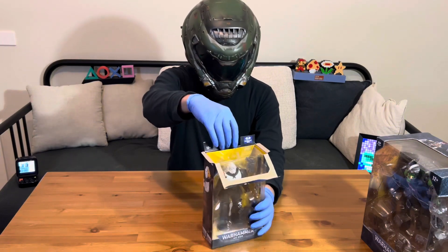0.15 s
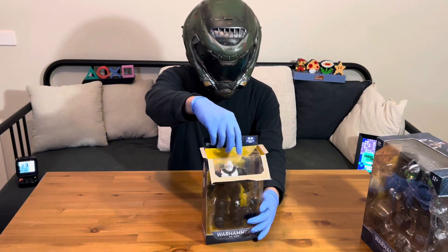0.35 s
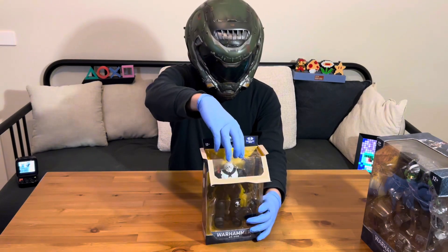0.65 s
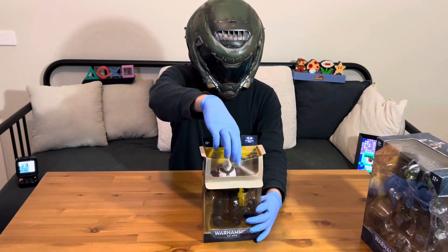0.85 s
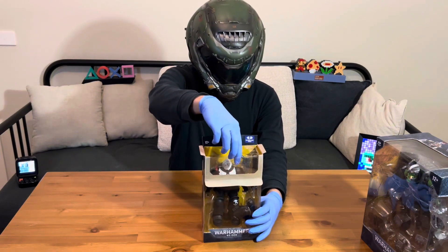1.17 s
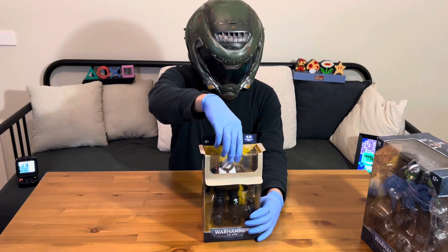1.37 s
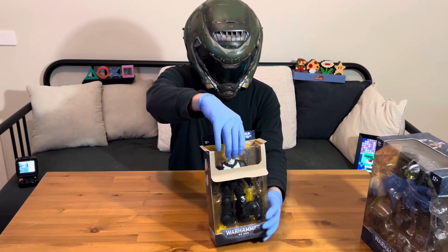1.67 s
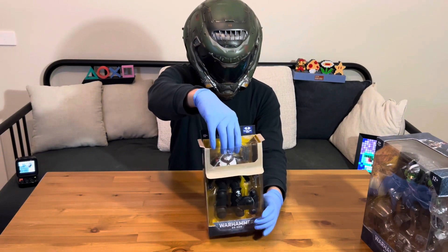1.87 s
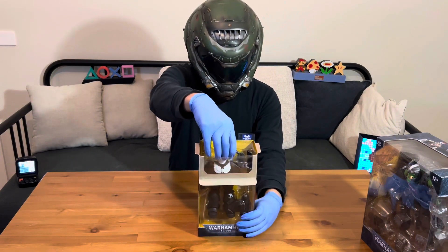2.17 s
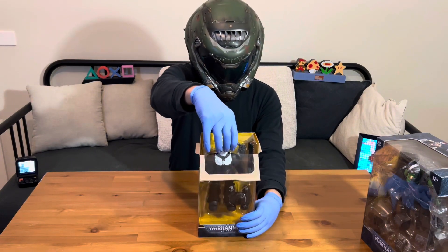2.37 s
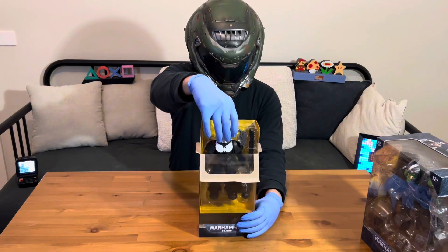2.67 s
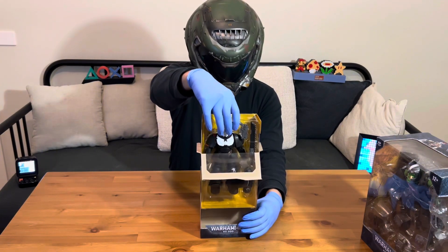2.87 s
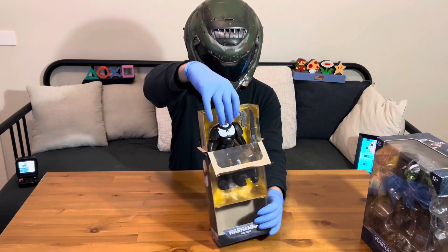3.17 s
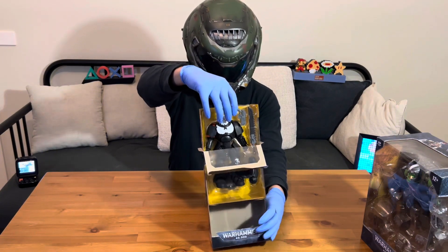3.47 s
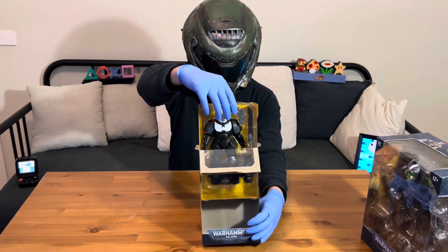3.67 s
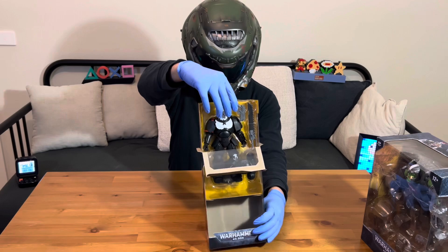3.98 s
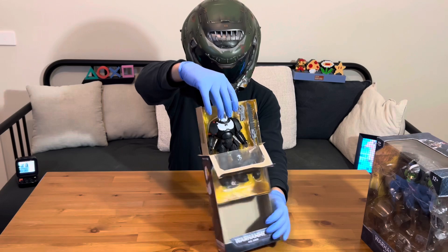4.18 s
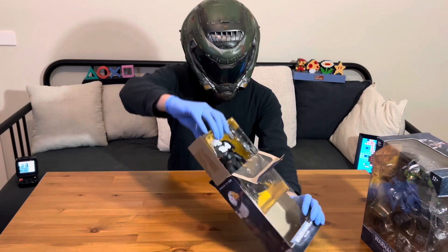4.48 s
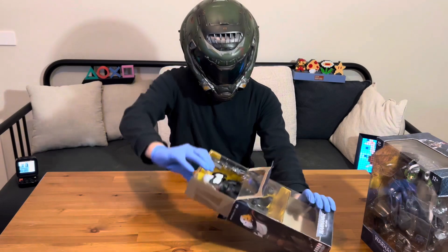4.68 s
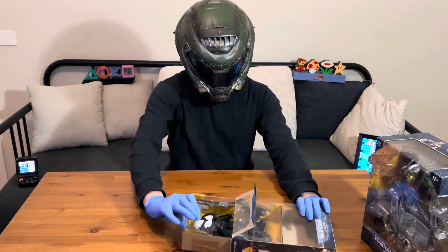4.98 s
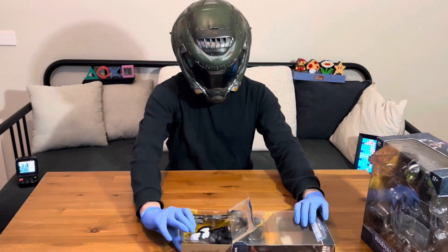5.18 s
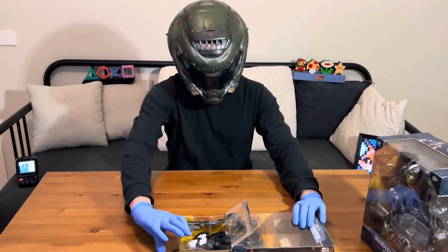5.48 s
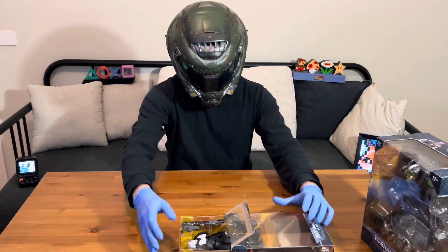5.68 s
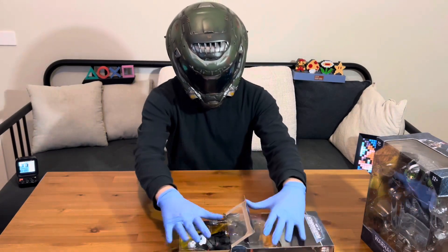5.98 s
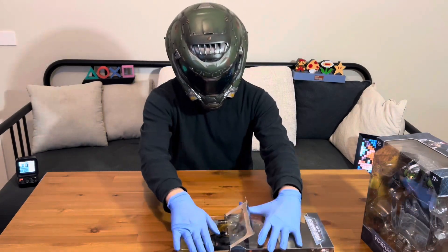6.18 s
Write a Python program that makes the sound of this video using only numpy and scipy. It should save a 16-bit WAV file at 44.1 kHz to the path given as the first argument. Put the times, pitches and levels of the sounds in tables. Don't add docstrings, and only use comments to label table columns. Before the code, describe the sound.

A cardboard box drags and knocks on a wooden table as a plastic tray is worked loose, then rubbed hard and banged down.

```python
import sys
import numpy as np
from scipy import signal
from scipy.fft import rfft, irfft
from scipy.io import wavfile
from scipy.ndimage import uniform_filter1d

SR = 44100
rng = np.random.default_rng(int(sys.argv[2]) if len(sys.argv) > 2 else 0)


def volts(x):
    e = np.asarray(x, float) / 20
    return 10 ** e


def master(y):
    cut = np.clip(np.atleast_2d(y).T, -1, 1)
    pcm = np.round(cut * 32767)
    wavfile.write(sys.argv[1], SR, pcm.astype(np.int16))


N = 279594


def unit(x):
    return x / np.sqrt(np.mean(x ** 2) + 1e-30)


def bins(size):
    return np.fft.rfftfreq(size, 1 / SR) + 1e-3


def along(table, hz):
    points = np.array(table)
    return np.interp(np.log(hz), np.log(points[:, 0]), points[:, 1])


def colour(x, table):
    size = x.shape[-1]
    return irfft(rfft(x) * volts(along(table, bins(size))), size)


def ring(x, modes):
    hz = bins(len(x))
    response = 0
    for k, (mode_hz, width, db) in enumerate(modes):
        resonance = 1j * hz * width / (mode_hz ** 2 - hz ** 2 + 1j * hz * width)
        response = response + (-1) ** k * volts(db) * resonance
    return irfft(rfft(x) * response, len(x))


def slips(size, scatter_db):
    return rng.standard_normal(size) * volts(scatter_db * np.minimum(rng.exponential(size=size), 5))


def walk(rate):
    hold = int(SR / rate)
    return uniform_filter1d(np.repeat(rng.standard_normal(N // hold + 1), hold), hold)[:N]


def burst(size, ms):
    t = np.arange(size) / SR
    fade = np.exp(-t / (max(ms, .5) / 1000)) * np.minimum(t / 0.0017, 1)
    spectrum = rfft(slips(size, 2.26) * fade)
    power = np.abs(spectrum) ** 2
    evened = spectrum / np.sqrt(power + 0.29 * power.mean())
    return irfft(evened, size) * np.sqrt(fade)


def add(out, s, db, sound):
    i = int(s * SR)
    out[i:i + len(sound)] += (volts(db) * sound / np.abs(sound).max())[:len(out) - i]


STROKE_DEPTH_DB, STROKE_BEND = 28, 1.523


def strokes(table, size=32):
    t = np.arange(0, N + size, size) / SR
    main, rider = 0, 0
    for s, rise, fall, db, rider_db in table:
        away = np.where(t < s, (s - t) / max(rise, .005), (t - s) / max(fall, .005))
        power = volts(2 * (db - STROKE_DEPTH_DB * away ** STROKE_BEND))
        main = main + power
        rider = rider + power * volts(2 * rider_db)
    return [np.interp(np.arange(N) / SR, t, np.sqrt(power)) for power in (main, rider)]


# pitch_hz, likeness_0_to_1
ALIKE = [(60, 0.99), (150, 0.79), (300, 0.57), (1000, 0), (5000, 0.01), (9000, 0.3), (14000, 0.91)]


def diffuse(size):
    alike = np.clip(along(ALIKE, bins(size)), 0, 1)
    mid, side = rfft(rng.standard_normal((2, size))) * np.sqrt([1 + alike, 1 - alike])
    return irfft([mid + side, mid - side], size) / np.sqrt(2)


# pitch_hz, level_db per Hz
AIR = [(15, -26), (25, 4), (92, 7.5), (144, -3.5), (273, -6.5), (543, -13), (1350, -20), (4860, -27),
       (5240, -22.5), (9000, -29.5), (10300, -48), (12000, -35.5), (13600, -59.5), (19800, -120)]
AIR_DB = -70
DUCK_FROM_DB, DUCK_SLOPE, DUCK_RELEASE_S = -37.5, 0.61, 0.32


def room_air(heard):
    air = volts(AIR_DB + 1.3 * walk(1.9)) * unit(colour(diffuse(N), AIR))
    keep = np.exp(-1 / (DUCK_RELEASE_S * SR))
    loud = signal.lfilter([1 - keep], [1, -keep], np.mean(heard ** 2, axis=0))
    return air * (1 + loud / volts(2 * DUCK_FROM_DB)) ** (-DUCK_SLOPE / 2)


# pitch_hz, t60_s
ROOM_T60 = [(60, 0.59), (150, 0.45), (500, 0.37), (1500, 0.41), (4000, 0.42), (7500, 0.34), (11000, 0.42),
            (16000, 0.31)]
# delay_s, spread_s, level_db over the tail
ECHOES = [(.004, 0.0012, 12.5), (.010, 0.00068, 7.5), (0.02, 0.0021, 5.5), (0.039, 0.0023, 3.5)]


def room(wet_db, size=24000):
    t, hz = np.arange(size) / SR, bins(size)
    noise = rfft(diffuse(size))
    tail = 0
    for centre in 30 * 2 ** np.arange(10.):
        band = np.clip(1 - np.abs(np.log2(hz / centre)), 0, 1)
        tail = tail + irfft(noise * band, size) * volts(-60 * t / along(ROOM_T60, centre))
    early_db = sum(db * np.exp(-((t - s) / spread) ** 2) for s, spread, db in ECHOES)
    response = volts(early_db + wet_db) * tail * np.minimum(t / 0.0062, 1)
    response[0, 0] += 1
    response[1, 2] += 1
    return response


# pitch_hz, width_hz, level_db
TABLE = [(62.5, 9.9, 4.5), (101, 180, -6.5), (164.6, 13, 0.5), (233.7, 18, -2)]
# start_s, peak_db, upper_modes_db re peak, contact_ms
THUDS = [(0.037, -66, -1, 3.4), (0.16, -51, -22, 6), (0.495, -45, 0, 4), (0.768, -47, 7, 5),
         (0.815, -34, -8, 4.8), (0.901, -35.5, -10, 10), (1.295, -44.5, -29, 6.7), (1.675, -71, -8, 2.9),
         (2.062, -31, -11.5, 1.6), (2.1, -34.5, -11, 8), (2.237, -54, -15, 3.1), (2.36, -61, -4, 7.2),
         (3.097, -45.5, -2, 3.7), (3.377, -45, -9, 3.9), (4.299, -65, 6, 3.4), (4.849, -56, 12, 1.4),
         (5.018, -58, -10, 5), (5.09, -45, 9, 4), (5.348, -60, -10, 4.8), (5.433, -41.5, -5, 7.5),
         (5.501, -36, -21, 7.6), (6.1, -55, -4.5, 5.3)]


def thuds(size=16384):
    out, t = np.zeros(N), np.arange(size) / SR
    for s, peak_db, upper_db, ms in THUDS:
        modes = TABLE[:2] + [(hz, width, db + upper_db + 17.0) for hz, width, db in TABLE[2:]]
        push = t * np.exp(-t / (max(ms, .5) / 2000))
        add(out, s - .003, peak_db - 10.5, ring(push, modes))
    return out


# pitch_hz, level_db per Hz
CARD = [(120, -53), (200, -1.5), (574, 6.5), (812, 2), (894, 0.5), (1120, -4.5), (1630, -6), (3500, -18.5),
        (4550, -59), (7700, -120)]
# pitch_hz, width_hz, level_db
BOX = [(340, 13, -20.5), (418, 15, -12), (584, 37.3, 3), (674, 4.9, -14.5), (903, 54, -0.5),
       (1020, 370, -13.5), (1320, 100, -17), (1700, 16, -4.5), (2430, 140, -11), (2970, 83, -29)]
# pitch_hz, level_db per Hz
RUB = [(900, -35), (1800, -10), (2700, 1), (4500, -0.5), (6500, 0.5), (9000, -6.5), (11000, -29)]
# pitch_hz, level_db per Hz
SHEEN = [(9000, -33.5), (11000, 0), (13000, -4.5), (16000, -3.5)]
# pitch_hz, level_db per Hz
SCUFF = [(600, -33.5), (1000, -5), (1600, -0.5), (2500, -4.5), (3600, -11), (5000, -46)]
# pitch_hz, level_db per Hz
HOLLOW = [(170, -32.5), (250, -5.5), (320, -3), (420, -2), (600, -39)]
# pitch_hz, level_db per Hz
SNAP = [(400, -27.5), (800, 4.5), (1100, 2), (1600, 2.5), (2300, -2), (3200, -8), (4300, -18),
        (6000, -39.5)]
# strongest_s, build_up_s, let_go_s, level_db,
# table_rumble_db re drag
DRAGS = [(0.0, .05, 0.36, -49, -9), (.35, 0.16, 0.18, -52.5, 4.5), (.494, 0.09, 0.23, -50.5, 3),
         (.785, 0.13, 1, -61, -10), (1.16, 0.035, 0.25, -65.5, -1), (1.25, 0.073, 0.28, -58, -3.5),
         (1.514, 0.07, 0.12, -55.5, -8), (1.75, 0.11, 0.071, -54.5, 0), (1.795, 0.029, 0.16, -53.5, -3),
         (2.07, 0.088, 0.32, -49, -3.5), (2.37, 0.23, 0.34, -51.5, 0.5), (2.63, 0.46, 1, -58.5, -31),
         (3.1, 0.098, 0.076, -55.5, -10), (3.37, 0.25, 0.12, -56.5, -11), (3.69, 0.25, 0.21, -58, -13.5),
         (3.95, 0.21, 0.75, -65.5, -6), (4.2, 0.039, 0.11, -63, 1.5), (4.29, 0.0077, 0.034, -52.5, -23),
         (4.4, 0.064, 0.096, -65, 4.5),
         (4.688, 0.064, 0.24, -55, -14),
    (4.92, 0.21, 0.12, -58.5, 10.5),
    (5.086, 0.077, 0.24, -50, 0),
    (5.21, 0.097, 0.32, -44, -3),
    (5.29, 0.079, 0.11, -41, -19),
    (5.364, 0.033, 0.18, -38, -13.5),
    (5.46, 0.13, 0.28, -44.5, -5.5),
    (6.14, 0.072, 0.51, -61, -0.5),
    (6.209, 0.051, 0.0663, -47.5, -15),
]
# strongest_s, build_up_s, let_go_s, level_db,
# sheen_db re rub
RUBS = [(0.0, .02, 0.07, -53.5, -18), (.126, 0.29, 0.11, -65, -24), (.38, 0.34, 0.23, -62.5, -22),
        (.5, 0.013, 0.12, -59.5, -31), (.7, 0.0074, 0.87, -69.5, -26), (1.25, 0.033, 0.22, -70.5, -19),
        (1.5, 0.057, 0.17, -62, -20), (1.74, 0.11, 0.022, -57.5, -39), (1.815, 0.0069, 0.12, -53, -40),
        (2.04, .025, 0.13, -57, -21), (2.14, 0.14, 0.07, -62.5, -26), (2.33, 0.52, 0.84, -59, -26.5),
        (2.63, 0.15, 1, -68.5, -21), (3.1, 0.11, 0.068, -55, -16), (3.34, 0.16, 0.099, -61.5, -24),
        (3.66, 0.088, 0.075, -68, -22), (3.73, 0.23, 0.1, -66, -25), (3.96, 0.095, 0.12, -69, -16),
        (4.18, 0.085, 0.025, -66, -21), (4.23, .02, 0.023, -84, -25), (4.03, 0.053, 0.057, -78, -21.5),
        (4.63, 0.059, 0.052, -74, -5.5), (6.08, 0.034, 0.055, -73.5, -12.5),
             (4.72, 0.15, 0.12, -58.5, -36), (4.92, 0.18, 0.42, -71.5, -23),
             (5.086, 0.077, 0.42, -62.5, -27), (5.21, 0.049, 0.11, -45.5, -18),
             (5.291, 0.019, 0.087, -41.5, -18), (5.39, 0.17, 0.32, -46, -27.5),
             (5.749, 0.11, 0.055, -59.5, -21.5), (5.962, 0.084, 0.064, -67.5, -16),
             (6.14, 0.063, 0.28, -66, -21), (6.196, 0.016, 0.11, -54.5, -40)]
# strongest_s, build_up_s, let_go_s, level_db, hollow_boom_db re scuff
SCUFFS = [(1.4, 0.15, .15, -83, 18), (1.55, 0.099, 0.086, -66, 9), (2.3, 0.084, 0.25, -55, -14),
          (2.75, 0.23, 0.2, -55, -27), (3.07, 0.25, .1, -61, -5), (3.13, 0.086, 0.14, -71, 12),
          (3.33, 0.2, 0.065, -57, -15), (3.68, 0.21, 0.13, -58.5, -6), (3.76, 0.12, 0.081, -56.5, -12),
          (3.95, 0.13, 0.24, -64, -11), (4.17, 0.076, 0.094, -64, -3), (4.3, 0.024, 0.052, -75, -4),
          (4.45, .04, 0.085, -79.5, 0), (4.9, .05, 0.28, -68, 7), (5.55, 0.072, 0.26, -57, 3)]
RIBS_DB = -17


def slide():
    drag, shake = strokes(DRAGS)
    rub, sheen = strokes(RUBS)
    scuff, boom = strokes(SCUFFS)
    grip = slips(N, 3.0) * volts(3 * walk(60))
    body = unit(unit(colour(grip, CARD)) + 0.029 * unit(ring(grip, BOX)))
    push = colour(rng.standard_normal(N), [(250, -3.5), (500, -41.0)]) * volts(2.1 * walk(7.3))
    rumble = unit(ring(push, TABLE))
    glove, edge = np.roll(grip, N // 3), np.roll(grip, -N // 3)
    skin = volts(-5.5) * rub * unit(colour(glove, RUB))
    skin = skin + volts(4.5) * sheen * unit(colour(glove, SHEEN))
    scraping = scuff * unit(colour(edge, SCUFF)) + boom * unit(colour(edge, HOLLOW))
    chatter = rub * unit(colour(grip ** 2 * np.sign(grip), SNAP))
    skin = skin + volts(-9.0) * scraping + volts(RIBS_DB) * chatter
    return volts(-5.5) * drag * body + skin + volts(-8.5) * shake * rumble


# level_db, pitch_hz, width_hz, spread_s
SQUEAK = (-62, 8108, 1300.5, 0.03)
SQUEAK_S = 5.756
SQUEAK_DRAG_DB, SQUEAK_DRAG_S = -11, .04


def glove_squeak():
    level_db, hz, width, spread = SQUEAK
    mode = [(hz, width, 0)]
    whistle = unit(ring(ring(rng.standard_normal(N), mode), mode))
    away = np.arange(N) / SR - SQUEAK_S
    swell = np.exp(-(away / spread) ** 2) + volts(SQUEAK_DRAG_DB) * np.exp(-(away / SQUEAK_DRAG_S) ** 2)
    return volts(level_db) * whistle * swell


# pitch_hz, level_db per Hz
FILM = [(4000, -31), (7500, -3), (11000, 1), (13000, 5.5), (16000, -6)]
# start_s, peak_db, length_ms
TICKS = [(0.379, -51.5, 2.8), (0.4914, -58, 1), (0.6983, -70, 2.5), (0.8092, -29.5, 3.1), (0.819, -35, 2.3),
         (1.663, -55, 5.6), (1.81, -42, 0.59), (2.017, -47.5, 2.5), (2.0604, -66, 2.2), (2.232, -55, 4.6),
         (4.6583, -69.5, 3), (5.1956, -36.5, 1.45), (5.274, -39, 3.4), (5.3627, -39.5, 2),
         (5.4329, -30, 3.2), (6.1978, -66, 2.1)]


def ticks(size=2048):
    out = np.zeros(N)
    for s, peak_db, ms in TICKS:
        add(out, s - .0005, peak_db + 2.5, colour(burst(size, ms), FILM))
    return out


# pitch_hz, level_db per Hz
CRACK = [(2500, -28), (5000, -5), (8000, -5), (11500, -0.5), (16000, -6.5)]
# start_s, peak_db
CRACKS = [(0.381, -43), (0.4977, -40), (0.6983, -68), (0.8096, -31), (0.8148, -41), (1.6628, -47),
          (1.8126, -35.5), (2.017, -46), (2.2335, -58), (3.084, -56), (4.6585, -54), (4.8565, -68),
          (5.1955, -47), (5.285, -44.5), (5.365, -45.5), (5.4351, -38.5), (6.0905, -69), (6.1985, -56)]


def cracks(size=256):
    out, t = np.zeros(N), np.arange(size) / SR
    for s, peak_db in CRACKS:
        snap = colour(rng.standard_normal(size) * np.exp(-t / 0.0005), CRACK)
        add(out, s, peak_db, snap * np.exp(-t / 0.001))
    return out


# start_s, peak_db, pitch_hz, t60_ms
PINGS = [(0.038, -66, 1630, 21), (0.193, -41, 970, 20), (0.21, -34, 487, 20), (0.39, -51, 1360, 24),
         (0.493, -48, 1780, 41), (0.54, -47, 685, 60), (0.761, -53, 1130, 25), (0.818, -23, 1305, 20),
         (0.822, -24.5, 680, 57), (0.824, -30.5, 1050, 26), (1.173, -63, 2280, 26), (1.294, -41, 1340, 16),
         (1.309, -46.5, 329, 100), (1.515, -52, 1010, 32), (1.813, -38.5, 1210, 25),
         (1.812, -48.5, 2290, 22), (2.072, -64, 1593, 40), (2.233, -46.5, 1570, 27), (2.233, -51, 3670, 15),
         (2.353, -57.5, 845, 37), (2.525, -39, 880, 22), (2.522, -39.5, 1960, 26), (3.055, -57.5, 1690, 33),
         (3.296, -57, 883, 38), (3.621, -58, 880, 25), (3.635, -56.5, 1020, 17), (4.164, -63.5, 1800, 28),
         (4.181, -59.5, 1560, 22), (4.222, -66, 1550, 20), (4.452, -71, 2920, 15), (4.66, -40, 1950, 11),
         (4.66, -45, 526, 46), (4.665, -50, 907, 160), (4.857, -36, 520, 18), (4.858, -53.5, 1210, 39),
         (5.157, -42, 1680, 32), (5.225, -36.5, 600, 44), (5.261, -38.5, 535, 39), (5.277, -39, 860, 30),
         (5.305, -37, 1706, 30), (5.35, -34, 1020, 30), (5.349, -40.5, 270, 50), (5.384, -39.5, 1448, 23),
         (5.439, -26.5, 1610, 62), (5.44, -28.5, 252, 52), (5.44, -31, 2200, 69), (5.445, -32.5, 1056, 52),
         (5.458, -20.5, 560.7, 113), (5.45, -28.5, 349, 60), (6.2, -50.5, 850, 170)]
# start_s, peak_db, pitch_hz, t60_ms
EDGE_RINGS = [(0.052, -36.5, 630, 17), (1.172, -54, 640, 22), (2.062, -37, 149.5, 78),
              (4.857, -45.5, 172, 74), (5.445, -35, 143.7, 70), (1.813, -46.5, 630, 28),
              (1.832, -52, 1300, 18), (2.5225, -33.5, 1460, 8.3), (2.523, -43.5, 2930, 8.2),
              (2.694, -60, 1670, 25), (3.66, -61.5, 1670, 25), (3.732, -60.5, 1070, 25),
              (4.287, -63.5, 1090, 25), (4.293, -61.5, 500, 19), (4.37, -60.5, 1156, 50),
              (4.452, -71.5, 1950, 12), (4.547, -72, 1610, 12), (5.176, -48.5, 460, 71),
              (5.212, -38.5, 590, 46), (5.221, -36.5, 388, 91), (5.364, -39, 260, 45),
              (5.434, -24.5, 1410, 16), (5.437, -19, 560, 74), (5.459, -19, 520, 33), (5.49, -36.5, 813, 74),
              (6.124, -54, 480, 20), (6.197, -51, 1390, 25), (6.21, -55, 890, 31), (6.213, -44, 1440, 25),
              (6.252, -54, 1430, 38)]
PING_PAIR, PING_PAIR_DB, PING_RISE_MS = 0.98, -9.5, 0.39


def pings(table, size=8192):
    out, t = np.zeros(N), np.arange(size) / SR
    for s, peak_db, hz, ms in table:
        pair = np.sin(2 * np.pi * hz * t) + volts(PING_PAIR_DB) * np.sin(2 * np.pi * PING_PAIR * hz * t)
        fade = volts(-60 * t / (max(ms, 5) / 1000)) * (1 - np.exp(-t / (PING_RISE_MS / 1000)))
        add(out, s - .001, peak_db, pair * fade)
    return out


# pitch_hz, level_db per Hz
HISS = [(2000, -24), (3200, 1.5), (5000, 0.5), (6500, 0.5), (8800, -8), (11600, -19), (16000, -23.5)]
# start_s, peak_db, pitch_hz, snap_db re peak, length_ms
CARD_KNOCKS = [(0.037, -30, 618, -24, 4.5), (0.05, -33, 516, -39, 19), (0.1925, -29.5, 549, -30, 1.6),
               (0.7, -50, 1070, 21, 8.9), (0.762, -48, 246, -9, 19), (1.173, -44, 613, -11, 12),
               (1.286, -45, 670, -15, 7.7), (1.297, -30.5, 480, -21.5, 3.8), (2.352, -42, 298, -4, 7.1),
               (2.5235, -27, 526, 5, 2.1), (4.289, -53, 401, -9.5, 4.6), (4.371, -59, 1217, -15.5, 5.6),
               (4.546, -63, 494, -14.5, 5.3), (5.015, -48.5, 624, -14, 8), (5.085, -41.5, 388, -5.5, 6),
               (5.158, -29.5, 867, -2, 4.8), (5.222, -36.5, 386, -28, 6.7)]
# start_s, peak_db, pitch_hz, snap_db re peak, length_ms
TRAY_KNOCKS = [(0.492, -35, 454, -0.5, 3.5), (0.809, -18, 529, -10, 6.1),
               (0.819, -13.5, 799.6, -14.5, 11.3), (0.837, -18.5, 513, -13, 6),
               (0.874, -24.5, 555, -10, 7.8), (1.676, -37.5, 481, -16, 12), (1.812, -38, 1124, -14.5, 8.3),
               (1.833, -44, 1190, -18, 5.6), (2.059, -35, 411, -12, 4.6), (2.234, -32, 486, -9.5, 7.8),
               (2.399, -44, 369, -32, 2.2), (4.178, -51.5, 671, -9.5, 5), (4.42, -63.5, 394, -13.5, 6.3),
               (4.748, -45, 430, -2, 7), (4.856, -34.5, 231.3, -13, 8.8), (5.193, -33.5, 1326, -16.5, 9.6),
               (5.304, -34, 656, -2.5, 1.1), (5.350, -30.5, 252.5, 4, 10), (5.439, -15, 539.5, -1.5, 20),
               (5.459, -18, 548.3, -4, 4.4), (6.09, -47.5, 382, -14.5, 20)]
# start_s, peak_db, pitch_hz, snap_db re peak, length_ms
CRUMPLES = [
    (0.376, -37.5, 404, -3.5, 15.5),
    (1.511, -44, 1020, 10, 7),
    (1.661, -41, 1205, -26, 18),
    (2.017, -45.5, 1260, 29, 15),
    (4.659, -35, 2080, -2.5, 20),
    (5.28, -28.5, 340, 7, 13),
    (5.433, -17, 1076, -6.5, 24),
    (6.198, -36, 1177, -16, 5),
]
CARD_CRACKLE_DB, TRAY_CRACKLE_DB, CRUMPLE_CRACKLE_DB = -32.5, -18.5, -4
RING_WIDTH, RING_DB = 0.045, 9.5


def knocks(size=4096):
    out = np.zeros((3, N))
    kinds = [(CARD_KNOCKS, CARD_CRACKLE_DB), (TRAY_KNOCKS, TRAY_CRACKLE_DB), (CRUMPLES, CRUMPLE_CRACKLE_DB)]
    blows = sorted(row + (db + max(row[3], 0),) for table, db in kinds for row in table)
    for k, (s, peak_db, hz, snap_db, ms, crackle_db) in enumerate(blows):
        run = burst(size, ms)
        reach_hz = min(hz * (1.23 + 2.67 * volts(0.73 * snap_db)), 9000)
        soft = signal.sosfilt(signal.butter(4, reach_hz, fs=SR, output="sos"), run)
        soft = signal.sosfilt(signal.butter(2, hz * 0.34, "high", fs=SR, output="sos"), soft)
        near = [(f, width, db - 9 * np.log2(f / hz) ** 2) for f, width, db in BOX]
        panel = ring(soft, [(hz, hz * 0.5, 2.5)] + near + [(hz, hz * RING_WIDTH, RING_DB)])
        snap = colour(run, SNAP)
        crackle = colour(burst(size, 0.91 * ms), HISS)
        parts = [(panel, 0), (snap, snap_db + 8.0), (crackle, crackle_db + 6.5)]
        blow = sum(volts(db) * x / np.abs(x).max() for x, db in parts)
        add(out[k % 3], s - .001, peak_db - 2.5, blow)
    return out


FACING_DB = -4.5


def scene():
    spots, edge_rings, rings = list(knocks()), pings(EDGE_RINGS), pings(PINGS)
    spots[0] = spots[0] + thuds() + volts(-3.0) * edge_rings
    spots[1] = spots[1] + volts(-1.5) * rings
    spots[2] = spots[2] + ticks()
    heard = sum(signal.fftconvolve(spot[None], room(wet_db=-28.0), axes=1)[:, :N] for spot in spots)
    rubbing, here, there = slide(), room(wet_db=-31.5), room(wet_db=-31.5)
    turn = np.pi / 4 * (1 + np.tanh(2 * walk(5)))
    steady = rubbing / np.sqrt(np.cos(turn) + np.sin(turn))
    for share, echo in ((np.cos(turn), here), (np.sin(turn), there)):
        heard = heard + signal.fftconvolve((share * steady)[None], echo, axes=1)[:, :N]
    heard = heard + cracks() + glove_squeak() + volts(FACING_DB) * (edge_rings + rings / 2)
    return heard + room_air(heard)


def band_limit(x):
    return signal.sosfilt(signal.butter(12, 16100, fs=SR, output="sos"), x)


# pitch_hz, level_db
LEFT_OVER_RIGHT = [(60, 0.5), (200, .5), (500, 2.5), (1000, 1), (3000, 1), (5200, 8), (7200, 7.5),
                   (9300, -1)]
# pitch_hz, share_0_to_1
SHARED = [(7500, 0), (8500, .45), (9400, .75), (10100, .96), (16000, .95)]
# pitch_hz, level_db
PORTS = [(20, -7), (60, 0), (7500, 0), (8300, -1.5), (9300, -1), (11000, 0.5), (13000, -7.5), (14500, -7),
         (15750, -2), (15900, -69)]
IN_PHASE_HZ, PHASE_TURN_HZ, PHASE_DWELL = 8600, 3400, .45


def record(dry):
    hz = bins(N)
    half = volts(along(LEFT_OVER_RIGHT, hz) / 2)
    left, right = rfft(dry) * [half, 1 / half]
    angle = 2 * np.pi * (hz - IN_PHASE_HZ) / PHASE_TURN_HZ
    turn = np.exp(1j * (angle - PHASE_DWELL * np.sin(2 * angle)))
    share = along(SHARED, hz)
    right = np.sqrt(1 - share ** 2) * right + share * turn * left / half ** 2
    mix = colour(irfft([left, right], N), PORTS)
    return band_limit(mix)


dry = scene()
out = record(dry)
master(out)
```